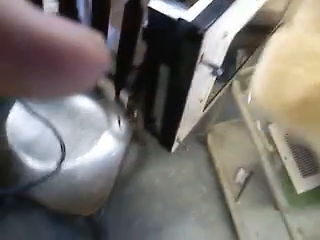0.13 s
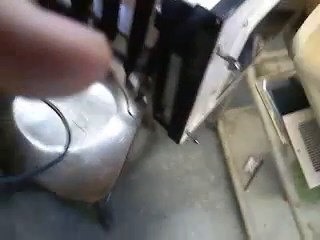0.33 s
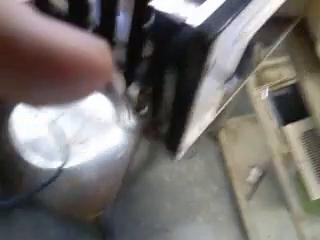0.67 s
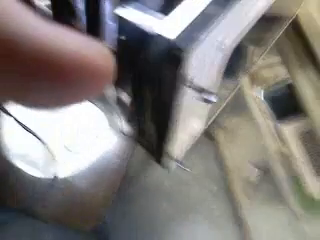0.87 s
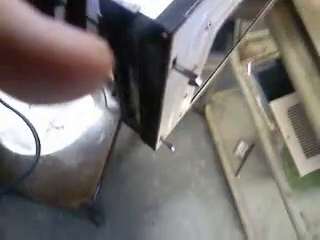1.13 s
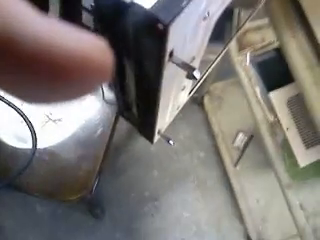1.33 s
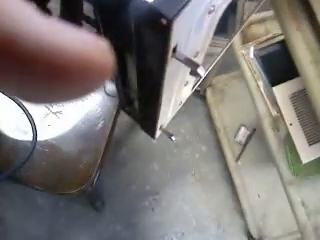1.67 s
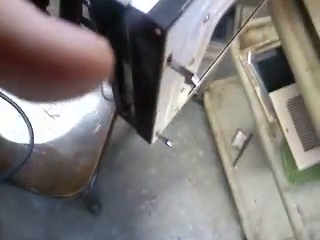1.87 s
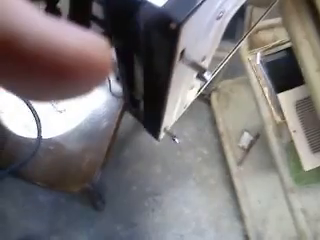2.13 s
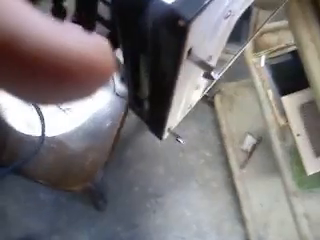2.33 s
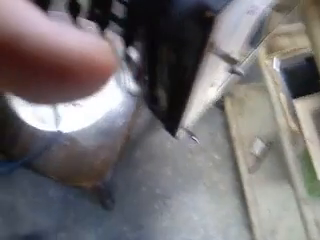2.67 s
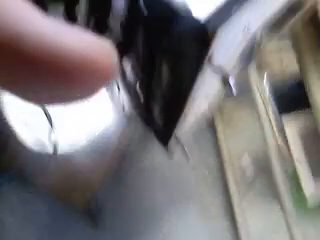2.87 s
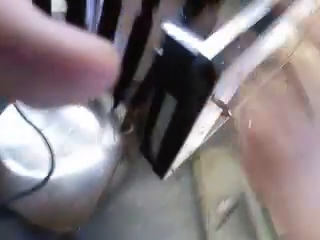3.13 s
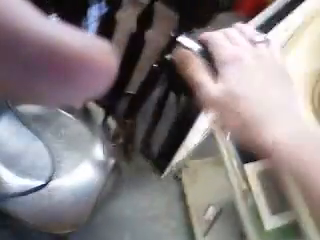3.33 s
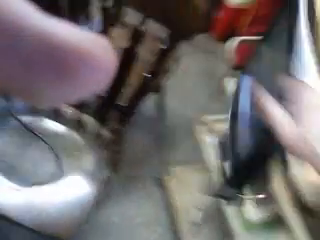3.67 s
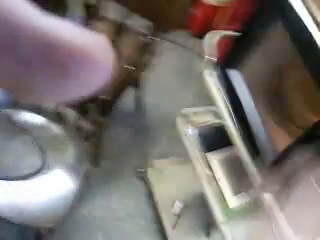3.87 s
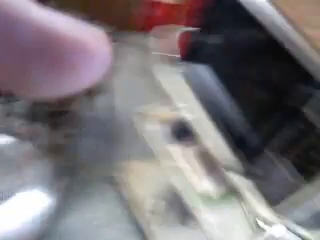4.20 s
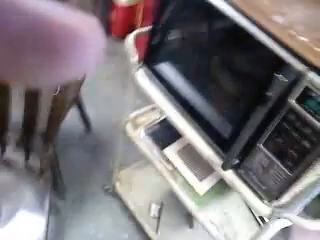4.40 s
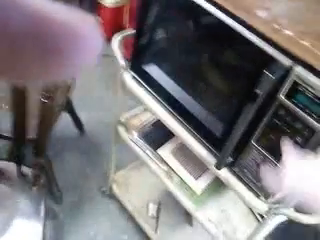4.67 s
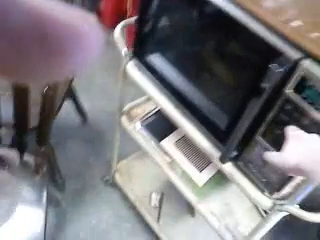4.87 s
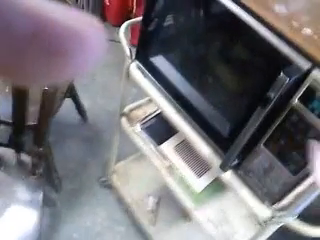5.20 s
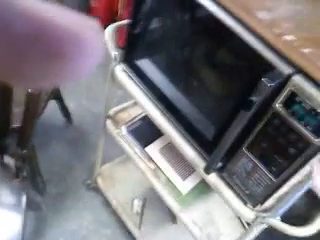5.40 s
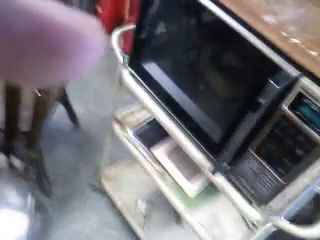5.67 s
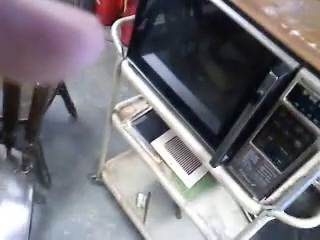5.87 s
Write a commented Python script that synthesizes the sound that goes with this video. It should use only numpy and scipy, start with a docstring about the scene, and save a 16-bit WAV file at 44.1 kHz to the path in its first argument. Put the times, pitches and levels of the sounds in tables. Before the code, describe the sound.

Quiet room tone with a faint steady whine. Hollow clunks ring a container's shell in separate bounces, fading in strength, with light rustles and scrapes of handling. After a few small taps, a low, quick judder runs straight into a very loud microwave door slam: latch, frame, rebounds, steel boom. Its hum dies slowly beneath soft movement and high ticks. The sound is dull-topped, close and overloaded, with some workshop reverberation.

```python
"""In a workshop small things tick, something slides brightly, and a hollow container, perhaps plastic,
knocks and bounces four times, ringing its shell, the last two times softer; a hand rustles and scrapes.
The hand grips a microwave door, which judders on its hinge and slams: latch, frame, rebounds.
The steel cabinet crashes, booms and hums on, among a few last ticks. Rings are dying sines, crashes are noise.
A faint whine and room tone run throughout; a narrow-band recorder cuts off the loudest peaks."""
import sys
import numpy as np
from scipy import signal
from scipy.fft import rfft, irfft
from scipy.io import wavfile
from scipy.ndimage import uniform_filter1d

SR = 44100
rng = np.random.default_rng(int(sys.argv[2]) if len(sys.argv) > 2 else 0)


def to_wav(s):
    """Save 16-bit WAV."""
    ch = np.atleast_2d(s).T  # columns
    pcm = np.round(np.clip(ch, -1, 1) * 32767)  # PCM
    wavfile.write(sys.argv[1], SR, pcm.astype(np.int16))


N = 265878  # length in samples

# In all tables "t60" is the time a sound takes to die by 60 dB.
# Noise spectra give only the balance of pitches: the overall level is set where they are used.

# Blows of the door: latch, frame, rebounds. Each row: start in seconds, crash level in dB, boom level in dB,
# ring length as a share of the free ring.
DOOR_BLOWS = [(4.5235, -16, -13, .6), (4.545, -17.5, -25.5, .5), (4.5675, -14, -10, 1.),
              (4.5732, -17, -12.5, .8), (4.5793, -13.5, -21.5, 0.18), (4.5915, -16, -10.5, .6),
              (4.636, -25.5, -32, 0.75), (4.69, -33.5, -41, .9), (4.79, -54, -34, 0.69)]
# Spectrum of the rattling panels and latch. Each row: frequency in Hz, relative level in dB per Hz.
CRASH_SPECTRUM = [(40, -40), (90, -15), (128, -4.5), (170, -16), (290, 2), (390, -9.5), (500, -5.5),
                  (700, -8.5), (1200, -14), (2000, -9.5), (2600, -13.5), (3400, -13.5), (4400, -31),
                  (7000, -84)]
# Ways the cabinet rings. Each row: frequency in Hz, relative level in dB, t60 of the free ring in seconds.
CABINET_MODES = [(165, 0, .13), (198, 0, .12), (60, -22, .2), (128, -10, .15), (219, -8, .15),
                 (296, -10, .2), (492, -12, .25), (615, -16, .25), (680, -14, .25), (925, -16, .2),
                 (1470, -20, .2), (1936, -22, .15), (2035, -20, .15), (2250, -20, .15), (2482, -18, .15),
                 (2757, -22, .15)]
CRASH_RISE_S, CRASH_T60_S = 0.0018, 0.2
BOOM_LAG_S = .002

# Long hum of the large panels. Each row: frequency in Hz, level in dB, t60 in seconds.
PANEL_HUM = [(123, -27, 1.44), (137.4, -24.5, 0.49), (202, -44, 0.46), (239, -43.5, 4.8), (243.3, -42.5, 3),
             (505, -53, 0.93), (530, -52, 2.72), (705, -45.5, 0.5), (890, -59, 0.77), (1200, -58, 2.2),
             (1480, -68, 2.5)]
GRIP_S, GRIP_DB = 3.44, -24  # the hand takes hold of the door; dB on top of the hum's own level

# Knocks of the container and its bounces. Each row: start in seconds, contact time in seconds, ring level in dB,
# brightness in dB per octave, favoured part of the shell in Hz, thud level in dB.
CONTAINER_KNOCKS = [(1.388, .006, -26, 3, 599, -46), (1.401, 0.0053, -25, 0.5, 950, -37.5),
                    (1.476, .004, -44, -0.5, 600, -49.5), (1.526, .01, -46, -1.5, 950, -41.5),
                    (2.169, 0.0051, -26, -2.5, 935, -28), (2.186, 0.0049, -30, -2, 498, -57.5),
                    (2.24, .006, -38.5, -3, 298, -56), (2.586, .0017, -37, -3, 300, -40),
                    (2.602, .007, -42.5, -4.5, 488, -53), (2.625, .003, -51.5, -1.5, 955, -50),
                    (3.055, 0.0023, -45.5, -4, 512, -43), (3.1, .006, -55, -4, 300, -46)]
# Ways the container rings. Each row: frequency in Hz, relative level in dB, t60 in seconds.
CONTAINER_MODES = [(268.3, -3.5, 0.29), (378.8, -8.5, 0.38), (501, -4, 0.21), (583, -5.5, 0.27),
                   (618.4, 0, 0.089), (701, -13.5, 0.42), (775, -12, 0.34), (877, -10, .1),
                   (919.6, 8, 0.085), (1037, -4, 0.14), (1258, -2, 0.082), (1288, -22.5, 0.23),
                   (1532, -21, 0.069), (1770, 1, .11), (1900, -19, 0.17), (2110, -13, 0.046),
                   (2270, -30.5, 0.103), (2620, -19.5, 0.17), (2975, -15, 0.13), (3060, -9, 0.096),
                   (3113, -10, 0.043)]
# Dense response of the container. Each row: frequency in Hz, relative level in dB per Hz.
CLATTER_SPECTRUM = [(35, -47.5), (60, -20), (433, -2), (597, -1.5), (837, -12), (910, -5), (1170, -16.5),
                    (1790, -13.5), (3400, -25.5), (4420, -50), (7480, -120)]
# Shelf under the container. Each row: frequency in Hz, relative level in dB, t60 in seconds.
SHELF_MODES = [(104.7, -10, 0.94), (166, -15.5, 0.9), (213.4, -9, 1)]
FAVOUR_DB, FAVOUR_OCTAVES = 8., 0.31  # boost near the favoured part, and how far it spreads

# The door judders on its hinge as it starts to swing.
JUDDER_FROM_S, JUDDER_GAP_S, JUDDER_HZ, JUDDER_DB, JUDDER_T60_S = 4.321, .0225, 188, -40, 0.056

# Small ticks and taps. Each row: start in seconds, level in dB before the spread shifts it, pitch in Hz,
# pitch spread as a share of the pitch (kept within 0.01 to 0.3 when used).
SMALL_TICKS = [(.78, -52, 876, 0), (.833, -51, 726, .15), (1.159, -46, 662, .15),
               (1.158, -47.5, 2132, 0.12), (1.378, -39.5, 707, 0.26), (2.11, -50.5, 757, 0),
               (3.165, -40, 794, .08), (3.168, -48, 1370, .08), (3.18, -46.5, 2407, .12),
               (3.201, -38, 808, .08), (3.205, -45.5, 1305, 0.11), (3.269, -53, 1740, 0.1),
               (3.322, -47, 1490, 0.01), (3.32, -55, 750, .03), (3.535, -51.5, 2270, 0.15),
               (3.774, -40, 576, .07), (3.776, -40.5, 419, 0.04), (4.008, -42.5, 2300, 0.24),
               (4.075, -45, 648, .15), (5.273, -48, 1480, 0.1), (5.275, -51, 2920, 0.16),
               (5.407, -44.5, 2742, 0.15), (5.56, -53.5, 3020, 0.2), (5.61, -51.5, 2920, 0.26),
               (5.717, -51, 2190, .11), (5.718, -50, 2920, 0.18)]
TICK_T60_S = 0.07
# Bright slide just before the first knock. Each row: frequency in Hz, relative level in dB per Hz.
SLIDE_SPECTRUM = [(700, -56), (1400, -12), (2000, -3), (3400, -2), (5000, -30)]
SLIDE_S, SLIDE_DB, SLIDE_T60_S = 1.36, -51, .2

# Movements of hand, sleeve and door. Each row: start in seconds, length in seconds up to the half-faded point,
# rustle level in dB, low rumble level in dB, scrape level in dB.
MOVEMENTS = [(1.64, 0.27, -66, -64.5, -81), (2.002, 0.21, -61, -74.5, -66.5), (3.126, 0.25, -61, -71, -65),
             (3.454, 0.36, -68.5, -61.5, -67), (3.752, 0.33, -58, -63, -68), (4.17, 0.16, -84, -64, -69),
             (4.37, 0.29, -59.5, -54.5, -59.5), (4.89, 0.34, -63, -54.5, -68.5),
             (5.256, 0.27, -67, -57.5, -69), (5.538, 0.36, -63, -61, -65.5), (5.93, .1, -65, -68, -73)]
# Rustle spectrum. Each row: frequency in Hz, relative level in dB per Hz.
RUSTLE_SPECTRUM = [(210, -35), (350, -21), (408, 10.5), (547, -10.5), (614, 7), (1100, -2.5), (1590, -8),
                   (3400, -9), (4420, -24.5), (7480, -120)]
# Rumble spectrum. Each row: frequency in Hz, relative level in dB per Hz.
RUMBLE_SPECTRUM = [(24, -66.5), (40, -34), (119, 2.5), (212, -17), (252, -3.5), (350, -19.5), (400, -15),
                   (520, -21), (880, -120)]
# Scrape spectrum. Each row: frequency in Hz, relative level in dB per Hz.
SCRAPE_SPECTRUM = [(900, -31.5), (1400, 1), (1620, 1.5), (1850, -2.5), (2600, -24.5)]
MOVE_RISE_S, MOVE_FALL_S = 0.023, 0.11
GRAIN_DB, GUST_DB = 2.26, 2.5  # typical unevenness: fast for rustle and scrape, slow for rumble

# Room tone. Each row: frequency in Hz, relative level in dB per Hz.
AIR_SPECTRUM = [(18, -74.5), (30, -39.5), (81, -2), (132, -5), (356, -7), (393, -11), (489, -6), (540, -11),
                (3400, -22), (4420, -34.5), (7480, -120)]
AIR_DB = -58
WHINE_HZ, WHINE_DB = 1410, -75

# Reverberation of the workshop. Each row: frequency in Hz, t60 in seconds.
WORKSHOP_T60 = [(60, 0.57), (250, 0.84), (500, 0.8), (1000, 0.48), (2000, 0.43), (4000, 0.55)]

# Response of the narrow-band microphone. Each row: frequency in Hz, gain in dB.
MIC_RESPONSE = [(20, -15), (50, -4.5), (110, -1), (3350, 2.5), (3600, -2), (3900, -6), (4300, -12.5),
                (4600, -53), (4900, -88.5)]
CEILING = .71  # the recorder overloads above this, on a full scale of 1
EDGE_HZ = 15750  # top of the recorded band
HISS_DB = -105  # level of the white noise that the hiss is made from


def gain_of(db):
    """Turns dB into a gain."""
    return 10 ** (np.asarray(db) / 20)


def read(points, hz):
    """Reads a table at the frequency hz, along a log axis."""
    f, value = np.transpose(points)
    return np.interp(np.log(hz + 1), np.log(f + 1), value)


def add(mix, start_s, sound):
    """Mixes a sound in at start_s seconds, cutting off what runs past the end."""
    part = mix[round(start_s * SR):][:len(sound)]
    part += sound[:len(part)]


def noise(spectrum, count):
    """Noise with the given spectrum and an average (rms) level of 1."""
    bins = rfft(rng.standard_normal(count))
    bins = bins * gain_of(read(spectrum, np.fft.rfftfreq(count, 1 / SR)))
    x = irfft(bins, count)
    return x / np.sqrt(np.mean(x ** 2))


def ring(modes, seconds, rise=.0003, rattle=0.):
    """Dying sines that start from rest and swell during contact; loose parts shake their phase and level."""
    hz, db, t60 = np.transpose(modes)[:, :, None]
    t = np.arange(round(seconds * SR)) / SR
    # Random points 256 samples apart, joined by straight lines
    steps = rng.standard_normal((2, len(modes), len(t) // 256 + 2))
    at = np.arange(len(t)) / 256
    points = np.arange(steps.shape[2])
    walks = np.cumsum(steps[0], axis=1)
    drift = np.array([np.interp(at, points, w - w[0]) for w in walks])
    lumps = np.array([np.interp(at, points, w) for w in uniform_filter1d(steps[1], size=3)])
    # The level shakes fully only after 34 ms
    level_db = db - 60 * t / t60 + 9 * rattle * lumps * np.minimum(t / 0.034, 1)
    sines = gain_of(level_db) * np.sin(2 * np.pi * hz * t + rattle * drift)
    return sines.sum(0) * (1 - np.exp(-t / rise))


def burst(spectrum, rise, t60, lumpy_db=0.):
    """Half a second of noise that swells quickly and dies unevenly, like many parts rattling."""
    t = np.arange(SR // 2) / SR
    lumps = uniform_filter1d(rng.standard_normal(len(t)), size=300)
    level_db = lumpy_db * lumps / lumps.std() - 60 * t / t60
    return noise(spectrum, count=len(t)) * (1 - np.exp(-t / rise)) * gain_of(level_db)


def slam():
    """Each blow of the door sets the panels crashing and, a moment later, booms in the cabinet."""
    out = np.zeros(N)
    for start_s, crash_db, boom_db, share in DOOR_BLOWS:
        crash = burst(CRASH_SPECTRUM, CRASH_RISE_S, CRASH_T60_S, lumpy_db=2.5)
        add(out, start_s, gain_of(crash_db) * crash)
        modes = [(hz, db + boom_db, share * free) for hz, db, free in CABINET_MODES]
        add(out, start_s + BOOM_LAG_S, ring(modes, 0.68, 0.00087, rattle=0.17))
    return out


def hum():
    """The large panels hum on after the main blow; the first mode stirs softly when the door is gripped."""
    out = np.zeros(N)
    main_blow_s = DOOR_BLOWS[2][0]
    add(out, main_blow_s, ring(PANEL_HUM, 2.6, 0.0065, rattle=0.14))
    add(out, GRIP_S, gain_of(GRIP_DB) * ring(PANEL_HUM[:1], 0.96, .04, rattle=0.2))
    return out


def shell_colour(hz, bright_db, part_hz):
    """Extra dB at hz: a knock tilts the tone around 600 Hz and favours pitches near its part of the shell."""
    near = np.exp(-(np.log2(hz / part_hz) / FAVOUR_OCTAVES) ** 2)
    tilt = bright_db * np.log2(np.clip(hz, 300, 3000) / 600)
    return tilt + FAVOUR_DB * near


def knocks():
    """Each knock rings the shell, most near the part that it favours, clatters, and thuds on the shelf."""
    out = np.zeros(N)
    for start_s, contact_s, ring_db, bright_db, part_hz, thud_db in CONTAINER_KNOCKS:
        modes = [(hz, db + ring_db + shell_colour(hz, bright_db, part_hz), t60)
                 for hz, db, t60 in CONTAINER_MODES]
        add(out, start_s, ring(modes, .5, contact_s, rattle=0.64))
        spectrum = [(hz, db + shell_colour(hz, bright_db, part_hz)) for hz, db in CLATTER_SPECTRUM]
        clatter = burst(spectrum, contact_s / 2, 0.16, lumpy_db=2.5)
        add(out, start_s, gain_of(ring_db + 2.5) * clatter)
        add(out, start_s, gain_of(thud_db) * ring(SHELF_MODES, 0.67, .004, rattle=0.5))
    return out


def judder(count=7):
    """Evenly spaced slips of the hinge, each a short low ring."""
    out = np.zeros(N)
    for k in range(count):
        slip = ring([(JUDDER_HZ, JUDDER_DB, JUDDER_T60_S)], 0.18, .003, rattle=.2)
        add(out, JUDDER_FROM_S + k * JUDDER_GAP_S, slip)
    return out


def ticks():
    """Each tick is a short ring inside a puff of noise around its pitch; the wider, the more scrape-like."""
    out = np.zeros(N)
    for start_s, db, hz, spread in SMALL_TICKS:
        width = np.clip(spread, .01, .3)
        band = [(hz / 4, -80), (hz * (1 - 2.5 * width), -25), (hz * (1 - width), 0),
                (hz * (1 + width), 0), (hz * (1 + 3 * width), -25), (hz * 4, -80)]
        # A wider tick has less ring and more noise
        add(out, start_s, ring([(hz, db - 40 * width, TICK_T60_S)], 0.21, 0.0019, rattle=0.17))
        puff = burst(band, 0.0018, TICK_T60_S, lumpy_db=-2.0)
        add(out, start_s, gain_of(db - 9 + 20 * width) * puff)
    return out


def slide():
    """One bright slide: a puff of high noise that dies unevenly."""
    out = np.zeros(N)
    add(out, SLIDE_S, gain_of(SLIDE_DB) * burst(SLIDE_SPECTRUM, .002, SLIDE_T60_S, lumpy_db=1.5))
    return out


def uneven(size, depth_db):
    """A gain that wanders at random; a larger size in samples makes it slower."""
    wander = uniform_filter1d(uniform_filter1d(rng.standard_normal(N), size=size), size=size)
    return gain_of(depth_db * wander / wander.std())


def motion():
    """Grainy rustle, soft rumble and scrape; each movement swells, holds unevenly and dies away."""
    t, out = np.arange(N) / SR, np.zeros(N)
    grain = uneven(500, GRAIN_DB)
    gusts = uneven(1500, GUST_DB)
    rustle = grain * noise(RUSTLE_SPECTRUM, count=N)
    rumble = gusts * noise(RUMBLE_SPECTRUM, count=N)
    scrape = grain * noise(SCRAPE_SPECTRUM, count=N)
    for start_s, length_s, *levels_db in MOVEMENTS:
        rise = (t - start_s) / MOVE_RISE_S
        fall = (start_s + length_s - t) / MOVE_FALL_S + .5
        shape = np.clip(np.minimum(rise, fall), 0, 1)
        out += shape * (gain_of(levels_db) @ [rustle, rumble, scrape])
    return out


def air():
    """Steady room tone with a faint whine whose pitch wavers by about 4 Hz."""
    waver = uniform_filter1d(rng.standard_normal(N), size=4000)
    whine_hz = WHINE_HZ + 4 * waver / waver.std()
    whine = np.sin(2 * np.pi * np.cumsum(whine_hz) / SR)
    return gain_of(AIR_DB) * noise(AIR_SPECTRUM, count=N) + gain_of(WHINE_DB) * whine


def workshop_echo(x):
    """Reverberation: sparse echoes of random sign, each band of pitch dying at its own speed."""
    taps = np.zeros(SR)
    # One echo at a random place in every 20 samples
    at = np.arange(300, SR - 20, 20) + rng.integers(0, 20, (SR - 301) // 20)
    taps[at] = rng.choice([-1., 1.], len(at))
    hz, t, bands = signal.stft(taps, SR, nperseg=512)
    decay = gain_of(-60 * t / read(WORKSHOP_T60, hz)[:, None])
    tail = signal.istft(bands * decay, SR, nperseg=512)[1]
    return signal.fftconvolve(x, tail / np.linalg.norm(tail))[:N]


def scene():
    """Mixes the near sources, their reverberation and the background."""
    container, door = knocks(), slam()
    small = ticks() + slide() + judder()
    wet = workshop_echo(gain_of(-15.5) * container + gain_of(-13.5) * door + gain_of(-4.5) * small)
    return (container + door + hum() + small + wet + motion() + air())[None]


def record(dry):
    """A narrow microphone band, then hard overload, a limit to the band, and faint hiss."""
    hz = np.fft.rfftfreq(N, 1 / SR)
    narrow = irfft(rfft(dry) * gain_of(read(MIC_RESPONSE, hz)), N)
    clipped = np.clip(narrow, -CEILING, CEILING)
    low_pass = signal.firwin(511, EDGE_HZ, window=("kaiser", 9), fs=SR)
    limited = signal.oaconvolve(clipped, low_pass[None], "same")
    # Differences between neighbouring samples make the hiss bright
    hiss = gain_of(HISS_DB) * np.diff(rng.standard_normal(N + 1))
    return limited + hiss


dry = scene()
out = record(dry)
to_wav(out)
```